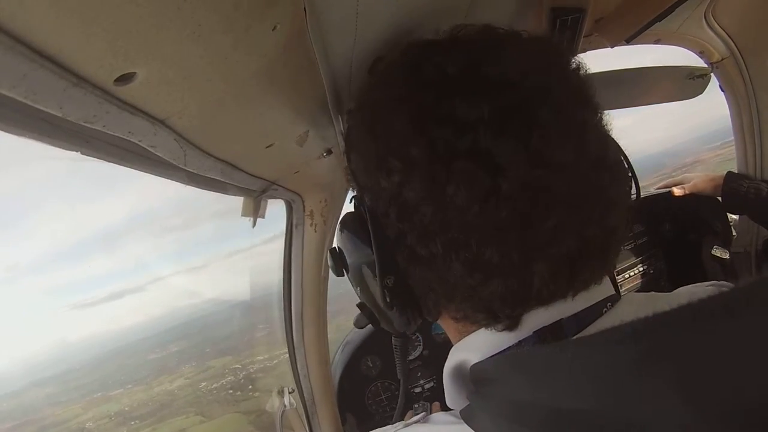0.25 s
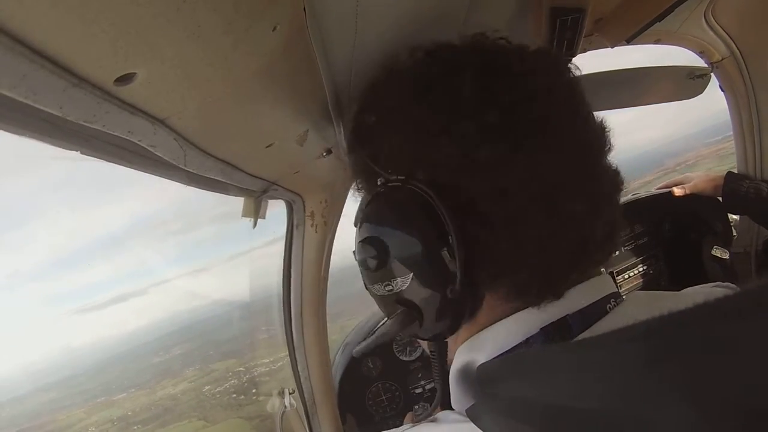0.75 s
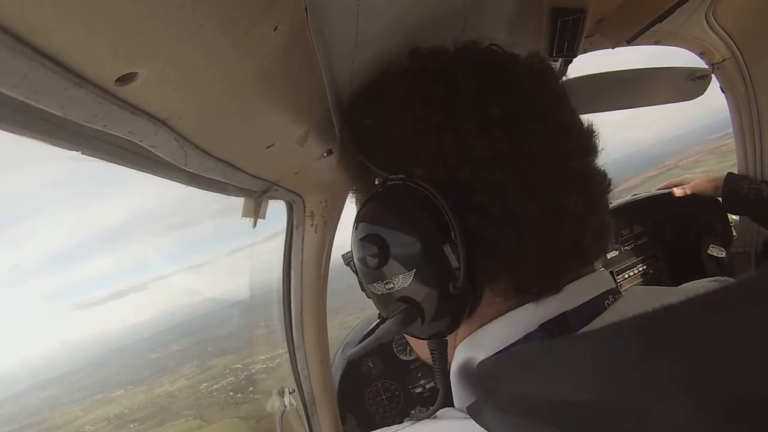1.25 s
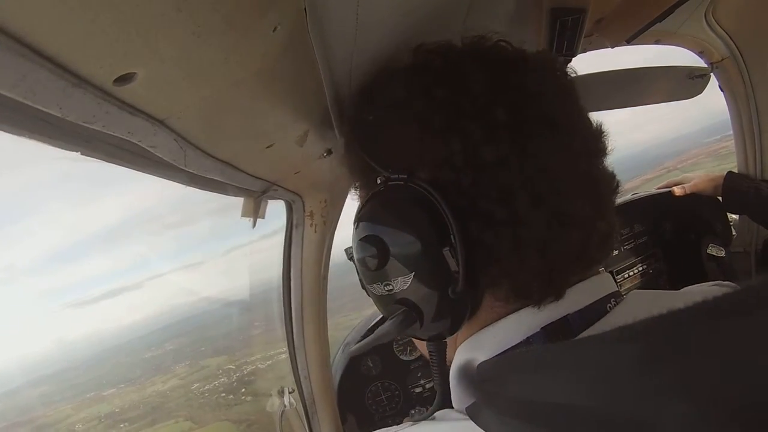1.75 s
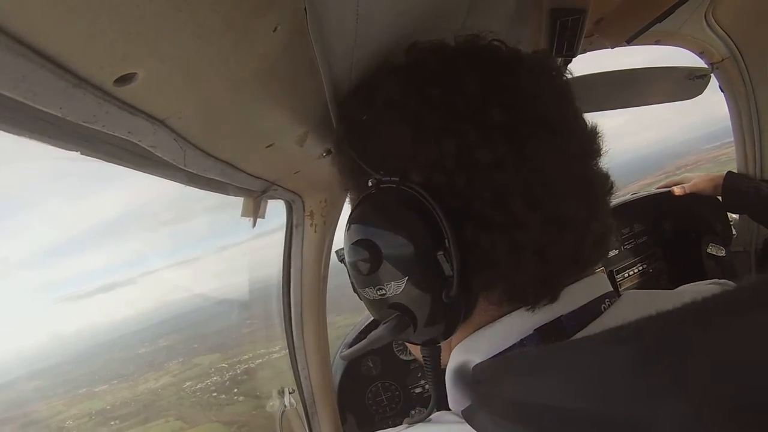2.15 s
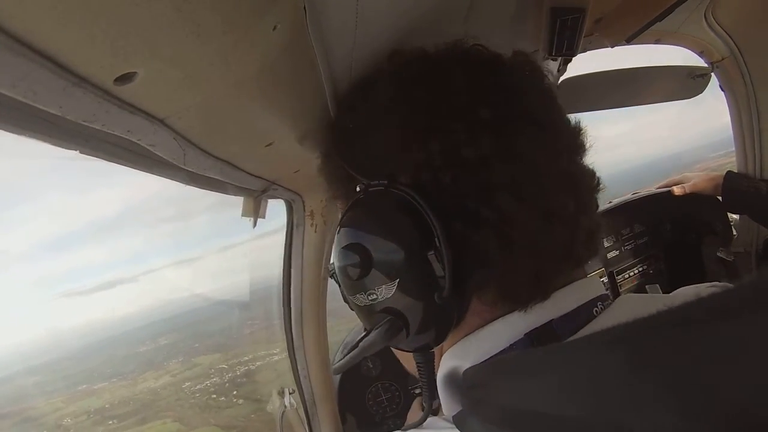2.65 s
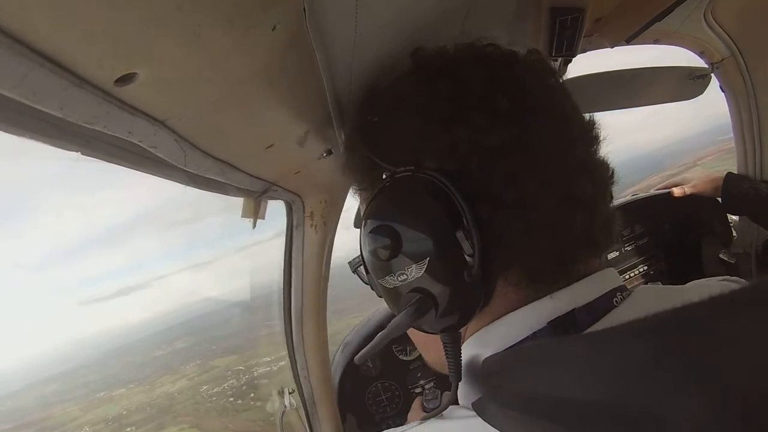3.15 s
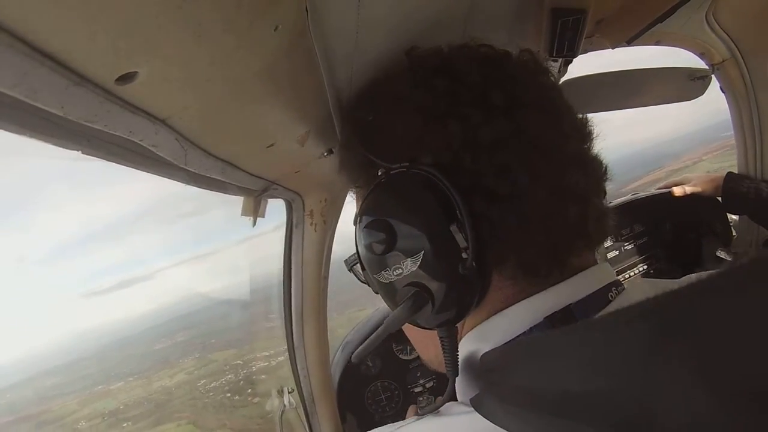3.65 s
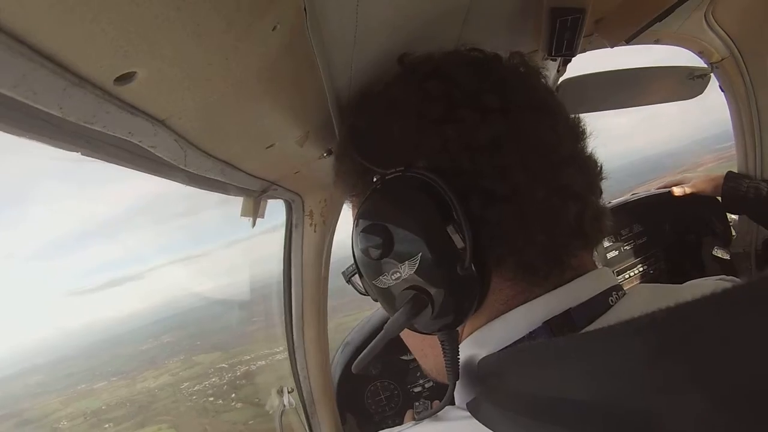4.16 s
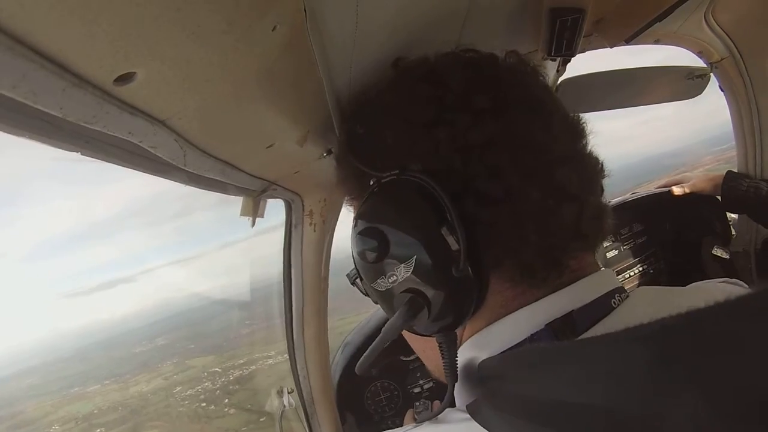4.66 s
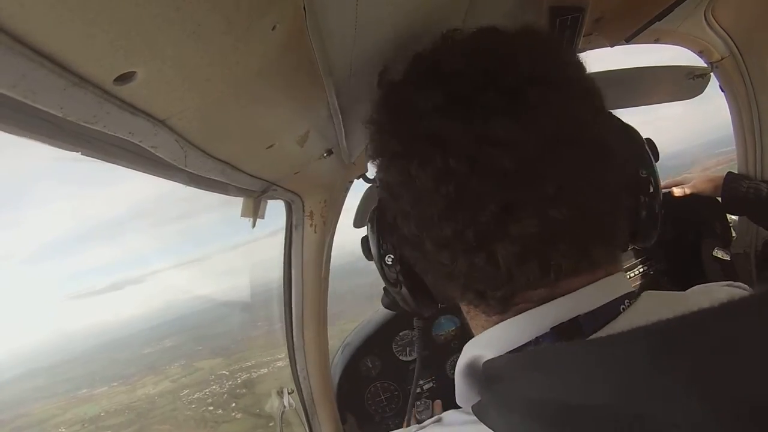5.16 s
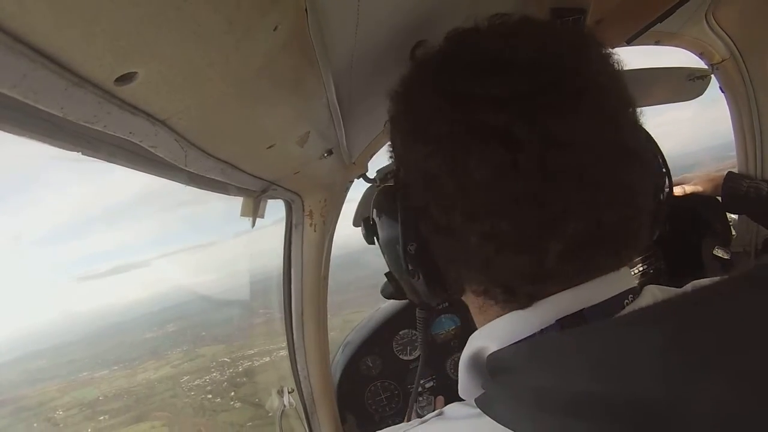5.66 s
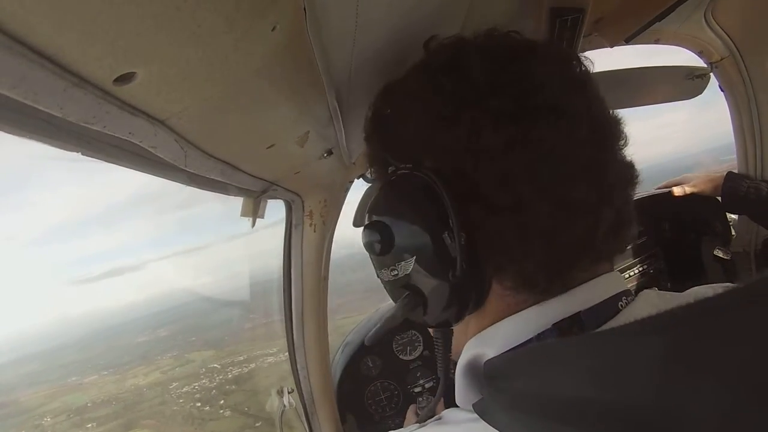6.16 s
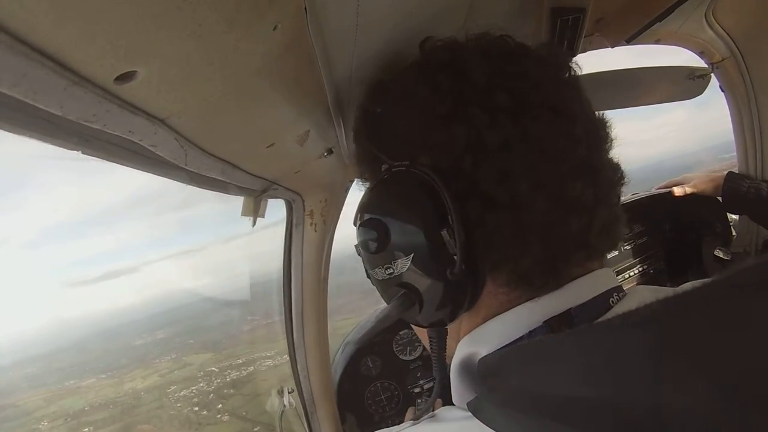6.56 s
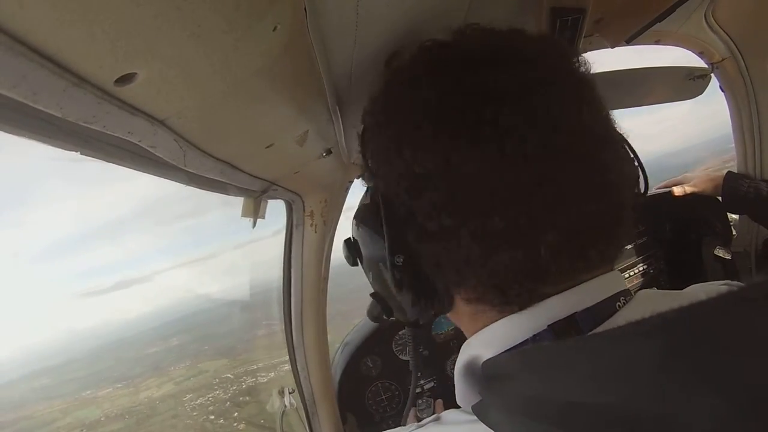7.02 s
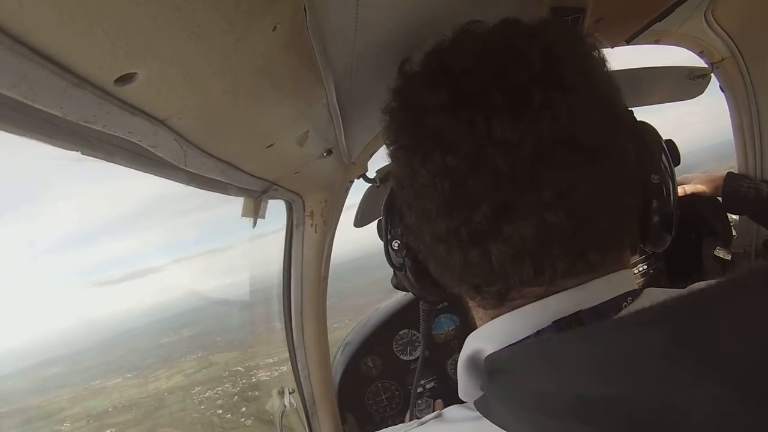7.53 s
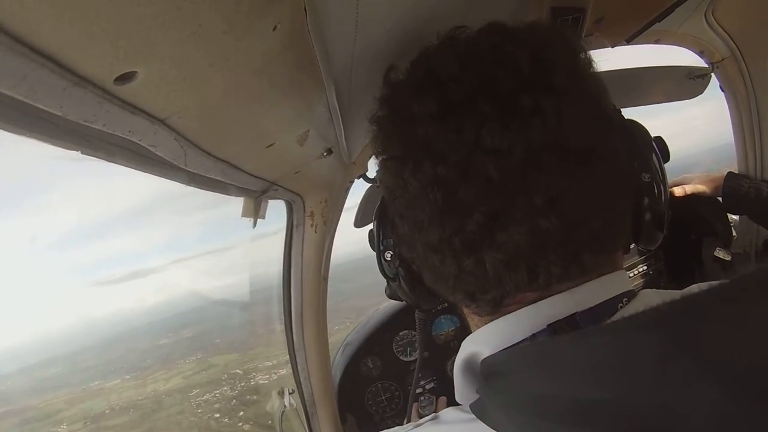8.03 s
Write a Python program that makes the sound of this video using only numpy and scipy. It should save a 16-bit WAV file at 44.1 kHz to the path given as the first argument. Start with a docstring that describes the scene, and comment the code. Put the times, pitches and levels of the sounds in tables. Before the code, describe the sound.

Steady low drone of a small piston aircraft engine and propeller inside the cabin, with rushing air, valve clatter and faint loose rattles.

```python
"""A four-cylinder aircraft engine and its two-blade propeller drone on the harmonics of one firing cycle.
Heard inside the cabin in cruise: the closing valves knock resonances of the panels into a clatter,
and a belt-driven accessory whines as a sine between the engine orders.
The slipstream is shaped noise that rushes and excites the cabin resonances; its lowest air mode booms.
A loose fitting ticks lightly and rattles now and then: brief blows that ring its modes."""
import sys
import numpy as np
from scipy import signal
from scipy.fft import rfft, irfft
from scipy.io import wavfile
from scipy.ndimage import uniform_filter1d

SR = 44100
rng = np.random.default_rng(int(sys.argv[2]) if len(sys.argv) > 2 else 0)


def to_wav(sig):
    """Store sig (one row per channel, or 1-D mono) as 16-bit WAV at the path in sys.argv[1].

    Samples outside -1..1 are clipped; the rate is SR.
    """
    pcm = np.clip(np.atleast_2d(sig), -1, 1) * 32767
    pcm = np.round(pcm).astype(np.int16)
    wavfile.write(sys.argv[1], SR, pcm.T)  # frames by channels


N = 365588
TIME = np.arange(N) / SR
FREQ = np.maximum(np.arange(N // 2 + 1) * SR / N, 1)

# resonant modes of the loose fitting: (frequency [Hz], width [Hz], relative level [dB])
FITTING_MODES = [(3140, 1800, 8), (6200, 3500, -5), (9400, 1600, -11.5), (11000, 1300, -16.5),
                 (13500, 1600, -12.5)]


def undb(db):
    """Amplitude ratio: a level in decibels becomes a linear gain."""
    return 10 ** (np.asarray(db) / 20)


def unit(x):
    """Normalisation: scale a signal to an rms of 1."""
    return x / np.sqrt(np.mean(x ** 2))


def curve(rows):
    """Linear interpolation: join (time [s], value) rows by straight lines."""
    return np.interp(TIME, *np.transpose(rows))


def walk(rate):
    """Slow random modulation: levels held for 1 / rate seconds, smoothed twice, with an rms of 1."""
    hold = max(int(SR / rate), 1)
    steps = np.repeat(rng.standard_normal(N // hold + 1), hold)
    smooth = uniform_filter1d(uniform_filter1d(steps, hold), hold)
    return unit(smooth[:N])


def resonances(modes):
    """Modal superposition: gain over frequency of steep resonances whose powers add."""
    power = 0
    for hz, width_hz, db in modes:
        detuning = (FREQ / hz - hz / FREQ) * hz / width_hz
        power = power + (undb(db) / (1 + detuning ** 2)) ** 2
    return np.sqrt(power)


def colour(x, gain):
    """Linear filtering: multiply the spectrum by a gain over frequency."""
    return irfft(rfft(x) * gain, N)


def turbulence(gain):
    """Broadband random pressure: white noise shaped to a given density per root Hz."""
    return colour(rng.standard_normal(N) * np.sqrt(SR / 2), gain)


def drone(cycle, rumble_db, sing_db, waver_db=0.6, waver_db_per_order=0.0149, twist_turns=.00055):
    """Harmonic series: exhaust, blades and shaft sound on cycle orders; higher ones flutter more."""
    # orders: (multiple of the two-turn engine cycle, rms level before modulation [dB])
    # order 4 is the firing and blade rate
    orders = [(1, -32), (2, -34), (4, -18.6), (5, -39), (7, -29), (8, -27.3), (9, -23.6), (10, -24.4),
              (11, -38), (12, -31), (13, -41.5), (14, -40.5), (16, -36.5), (17, -44), (22, -36.5),
              (25, -49), (28, -47), (29, -51), (32, -49), (33, -43), (34, -48), (35, -48), (36, -40.5),
              (37, -36.5), (40, -50), (64, -50), (70, -50), (82, -42), (90, -46), (98, -44.5)]
    out = 0
    for order, db in orders:
        # orders that fall on the cabin modes swell with the rumble; the upper ones swell together
        swell_db = .6 * rumble_db * (6 < order < 13) + sing_db * (24 < order < 41)
        flutter_db = (waver_db + waver_db_per_order * order) * walk(9)
        # the crankshaft twists a little at random, which blurs the top orders
        twist = twist_turns * order * walk(20)
        phase = order * cycle + twist + rng.random()
        amplitude = undb(db + swell_db + flutter_db) * np.sqrt(2)
        out = out + amplitude * np.sin(2 * np.pi * phase)
    return out


def clatter(cycle, ring_s=0.009, jitter_s=.0001, scatter_db=0.9, grit=0.49, wash_db=-3):
    """Impact excitation: each valve knocks once a cycle along its own path, never quite alike."""
    # valve closings: (place in the cycle [0-1], relative strength [dB])
    closings = [(.03, -7.5), (.11, 0), (.29, -2), (.35, -9.5), (.42, -2.5), (.59, -5), (.70, -5),
                (.81, -0.5)]
    # panel resonances that the engine shakes: (frequency [Hz], width [Hz], relative level [dB])
    panel_modes = [(1362, 423, -60.5), (1680, 120, -56.5), (1837, 123, -55), (2035, 310, -56.5),
                   (2236, 234, -58.5), (2588, 226, -62.5)]
    panel_low_hz = 970  # the panels radiate little below this
    turns = np.arange(int(cycle[-1]) + 1)
    decay = np.exp(-TIME[:SR // 20] / ring_s)
    knocks, shake = 0, 0
    for place, db in closings:
        when = np.interp(turns + place, cycle, TIME) + jitter_s * rng.standard_normal(len(turns))
        size = undb(db + scatter_db * rng.standard_normal(len(turns)))
        size = size * (turns + place < cycle[-1])
        blows = np.bincount(np.clip(when * SR, 0, N - 1).astype(int), size, N)
        path = decay * rng.standard_normal(len(decay))
        knocks = knocks + signal.oaconvolve(blows, path)[:N]
        shake = shake + signal.oaconvolve(blows, decay)[:N]
    # each knock also sets off a short random chatter, over the even wash of the propeller
    chatter = (grit * unit(shake) + undb(wash_db)) * rng.standard_normal(N)
    panels = resonances(panel_modes) / (1 + (panel_low_hz / FREQ) ** 12)
    ringing_chatter = colour(chatter, panels) / np.sqrt(np.mean(panels ** 2))
    return unit(unit(colour(knocks, panels)) + ringing_chatter)


def whine(cycle, db=-43.5, slip_hz=1.6, flutter_hz=5, grain_db=2.7):
    """Frequency modulation: a belt-driven accessory, likely the alternator, slips unevenly as it sings."""
    ratio = 43.36  # turns of the tone per engine cycle, between two whole orders
    slip = slip_hz * walk(6) + flutter_hz * walk(60)
    phase = ratio * cycle + np.cumsum(slip) / SR
    return undb(db + grain_db * walk(25)) * np.sqrt(2) * np.sin(2 * np.pi * phase)


def slipstream(cycle, swell_db, rumble_db, blade_depth=.12, flutter_db=.5, rumble_hz=280, hiss_hz=2800):
    """Flow noise: turbulent air excites the cabin modes; its hiss pulses with each passing blade."""
    # rush of air: (frequency [Hz], density level [dB per root Hz])
    rush = [(12, -53), (24, -44), (34, -54), (100, -46), (300, -51), (480, -55), (560, -61.5), (1000, -75),
            (3000, -75), (4500, -85.5), (7000, -91), (8200, -99), (12500, -107), (15000, -116)]
    # cabin resonances: (frequency [Hz], width [Hz], density level [dB per root Hz])
    cabin_modes = [(159.3, 29, -37), (198.4, 33.5, -36), (434.4, 84, -50), (739, 182, -55.5),
                   (3770, 1100, -82), (6030, 1040, -86), (7200, 740, -95), (9250, 730, -99),
                   (10900, 500, -105), (13400, 1000, -107)]
    hz, db = np.transpose(rush)
    rush_gain = undb(np.interp(np.log(FREQ), np.log(hz), db))
    gain = np.hypot(rush_gain, resonances(cabin_modes))
    # power shares of the low and the high band
    bass = 1 / (1 + (FREQ / rumble_hz) ** 4)
    treble = 1 / (1 + (hiss_hz / FREQ) ** 2) ** 2
    # two blades, two turns a cycle
    blades = 1 + blade_depth * np.sin(2 * np.pi * (2 * 2) * cycle)
    rumble = turbulence(gain * np.sqrt(bass)) * undb(rumble_db)
    roar = turbulence(gain * np.sqrt((1 - bass) * (1 - treble))) * undb(0.6 * swell_db)
    hiss = turbulence(gain * np.sqrt(treble)) * blades * undb(swell_db + flutter_db * walk(18))
    return rumble + roar + hiss


def boom(hz=70, width_hz=13, skirt_hz=50, trim_db=-1.4, evenness=.8):
    """Cavity resonance: turbulence rings the lowest air mode of the cabin, which throbs at random."""
    # boom level before the final filter: (time [s], level [dB])
    boom_level = [(0.0, -16), (0.18, -26), (0.32, -16), (2.04, -15.5), (2.16, -18), (2.98, -21.5),
                  (3.16, -13.5), (3.78, -22.5), (3.96, -16), (4.72, -16.3), (4.92, -24.8), (5.22, -14),
                  (5.96, -19), (7.26, -14.5), (7.42, -21.9), (7.76, -12), (7.98, -21.9), (8.28, -15)]
    ring = unit(turbulence(resonances([(hz, width_hz, 0)])))
    # partly even out the slow random swells before the level curve is laid on
    slow = np.sqrt(uniform_filter1d(ring ** 2, SR // 4))
    throb = unit(ring / slow ** evenness) * undb(curve(boom_level))
    return colour(throb, resonances([(hz, skirt_hz, trim_db)]))


def contacts(blows, modes, ring_s):
    """Impulse response: each blow is a brief decaying crack of noise, filtered by the given modes."""
    # the tiny offset keeps the filter off vanishingly small numbers
    ringing = signal.lfilter([1], [1, -np.exp(-1 / (ring_s * SR))], blows + 1e-18)
    body = resonances(modes)
    return colour(ringing * rng.standard_normal(N), body / np.sqrt(np.mean(body ** 2)))


def ticks(rate_hz=14, db=-55, spread_db=3.5):
    """Random point process: light touches in loose clusters ring only the fitting's top modes."""
    touches = rng.random(N) < rate_hz / SR * (1 + np.tanh(walk(4)))
    size = undb(db + spread_db * np.clip(rng.standard_normal(N), -2, 2))
    return contacts(touches * size, FITTING_MODES[2:], ring_s=.0005)


def rattle(bounce_hz=1100, trim_db=-3.5, rise_s=0.0022):
    """Repeated impact: a loose fitting bounces unevenly in short runs that build quickly and die away."""
    # rattle runs: (time [s], relative peak level [dB], decay time [s])
    runs = [(.552, -37, .004), (0.897, -29, .012), (1.219, -25, .008), (1.249, -18, 0.0083),
            (2.743, -27, .008), (2.960, -31, .01), (3.140, -24, .008), (3.593, -27, .006),
            (3.619, -23, .015), (3.859, -29, .012), (3.925, -26, .003), (6.150, -24, .008),
            (6.303, -27, .004), (6.814, -26, .02), (7.337, -27, .004), (7.483, -30, .004),
            (8.060, -30, .01)]
    blows = np.zeros(N)
    for start, db, decay_s in runs:
        after = np.arange(-2 * rise_s, 2 * decay_s, 1 / bounce_hz)
        chance = rng.random((SR // 100, 2))[:len(after)]
        at = ((start + after + chance[:, 0] / bounce_hz) * SR).astype(int)
        size = .3 + .7 * chance[:, 1] ** 2
        envelope = np.exp(np.minimum(after / rise_s, -after / decay_s))
        blows[np.clip(at, 0, N - 1)] += undb(db) * envelope * size
    return undb(trim_db) * contacts(blows, FITTING_MODES, ring_s=.0006)


def scene():
    """Phase locking: one crankshaft phase times the engine and blades; air and fitting sounds add to it."""
    # engine speed: (time [s], speed [revolutions a minute])
    speed = [(0, 2469), (0.3, 2469), (0.7, 2464), (1.3, 2460), (1.7, 2466), (2.05, 2464), (2.55, 2449),
             (2.9, 2446), (3.6, 2451), (4.2, 2453), (4.8, 2459), (5.8, 2458), (6.5, 2465), (7.4, 2470),
             (7.8, 2465), (8.29, 2459)]
    # swell of the valve clatter and the hiss: (time [s], level [dB])
    clatter_level = [(0.0, -1.2), (1.0, 1.2), (1.3, -0.6), (2.44, 0.65), (3.04, -0.4), (4.84, 1.5),
                     (5.24, -0.7), (5.9, -1.9), (6.64, 0.3), (7.6, -1.0), (7.86, 1), (8.28, -1.3)]
    # swell of the cabin rumble: (time [s], level [dB])
    rumble_level = [(0.0, -0.3), (0.36, -2.5), (1.1, 1.5), (1.34, -1.2), (2.88, 0.94), (6.14, 0.2),
                    (6.32, -2), (6.56, 2), (6.96, -2.5), (8.28, 1.4)]
    # swell of the singing upper orders and the whine: (time [s], level [dB])
    sing_level = [(0, -2), (1.05, 3.3), (1.42, -2), (1.8, 2), (2.6, 1.5), (3.3, 0.2), (4.2, 0.5),
                  (4.8, 0.5), (5.4, -1), (5.9, -2), (6.6, -1.8), (7.1, -1.2), (8.29, 2)]
    cycle = np.cumsum(curve(speed) / 60 / 2) / SR  # a four-stroke cycle takes two turns
    swell_db, rumble_db, sing_db = curve(clatter_level), curve(rumble_level), curve(sing_level)
    valves = clatter(cycle) * undb(-28.5 + swell_db)
    engine = drone(cycle, rumble_db, sing_db) + valves + whine(cycle) * undb(sing_db)
    air = slipstream(cycle, swell_db, rumble_db) + boom()
    fitting = ticks() + rattle()
    return (engine + air + fitting)[None]


def record(dry, ceiling=1.83):
    """Band limiting and soft saturation: drop infrasound, round loud peaks, cut the top, ease the ends."""
    top_hz, ease_s = 15000, .002
    dry = signal.sosfilt(signal.butter(3, 13, "high", fs=SR, output="sos"), dry)
    ease = np.minimum(np.minimum(TIME, TIME[-1] - TIME) / ease_s, 1)
    rounded = ease * ceiling * np.tanh(dry / ceiling)
    return signal.sosfilt(signal.ellip(8, .2, 70, top_hz, fs=SR, output="sos"), rounded)


dry = scene()
out = record(dry)
to_wav(out)
```